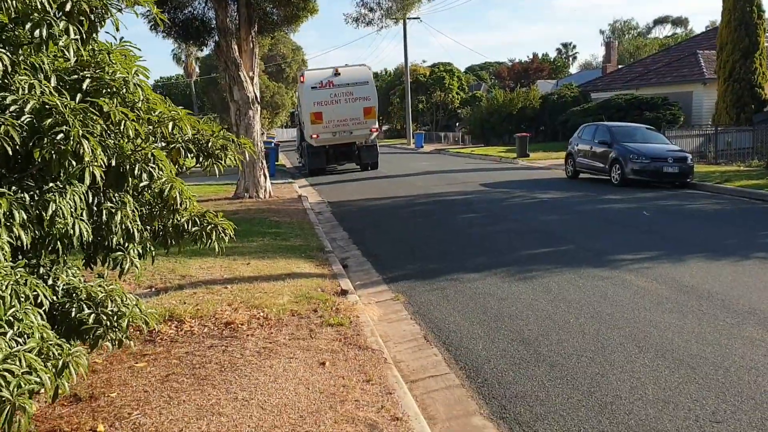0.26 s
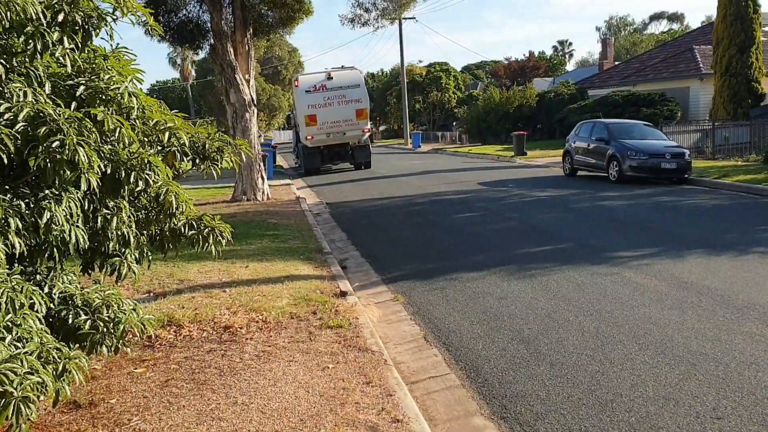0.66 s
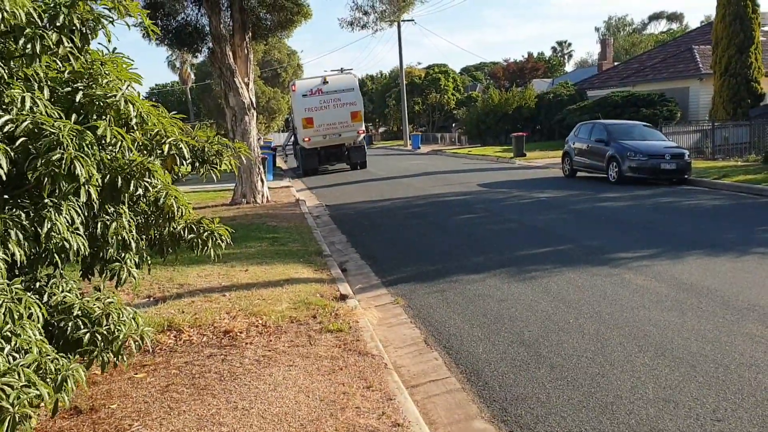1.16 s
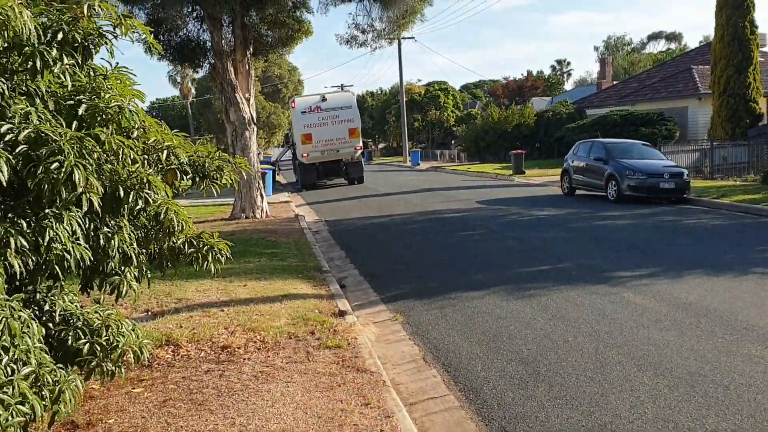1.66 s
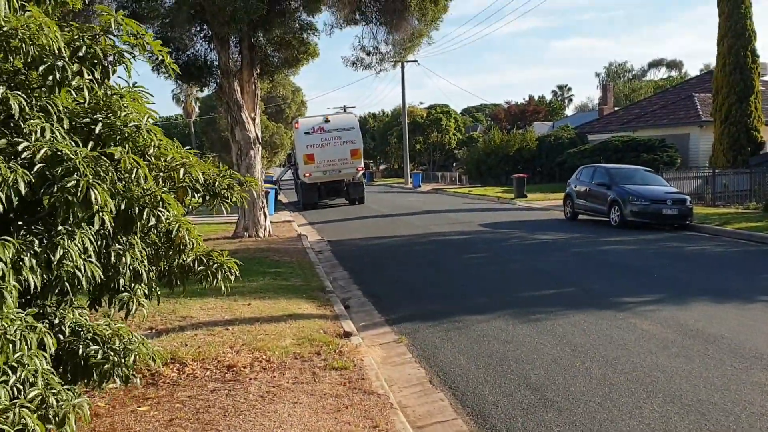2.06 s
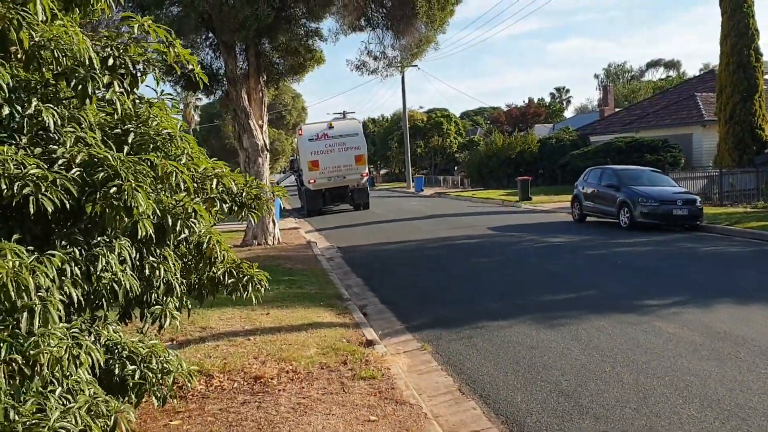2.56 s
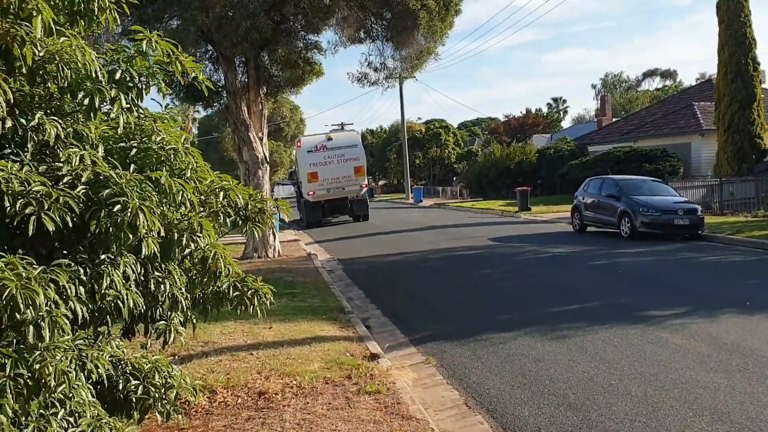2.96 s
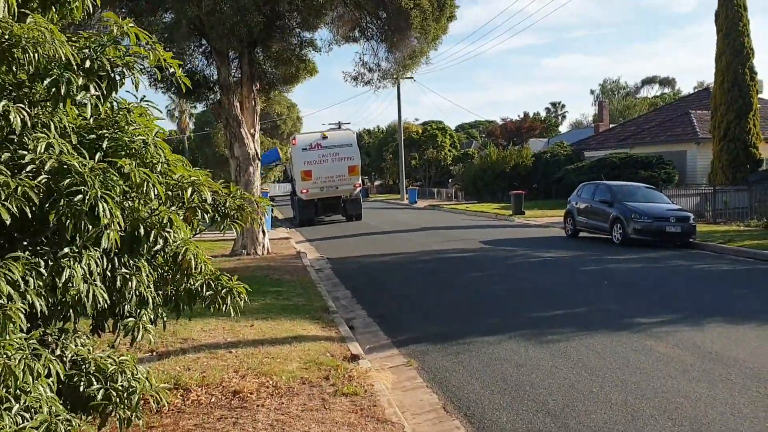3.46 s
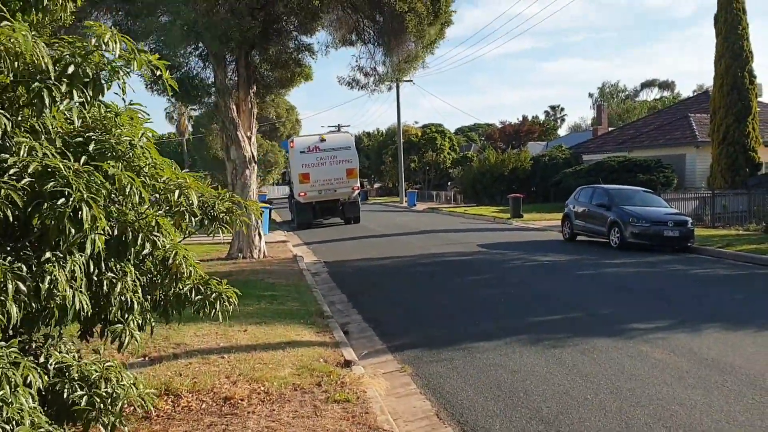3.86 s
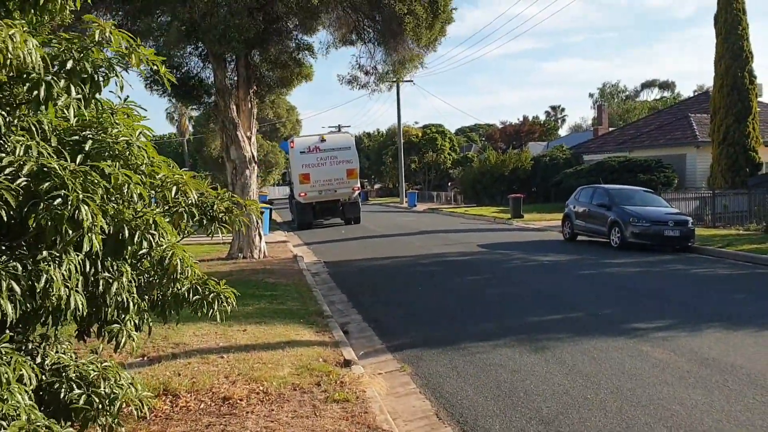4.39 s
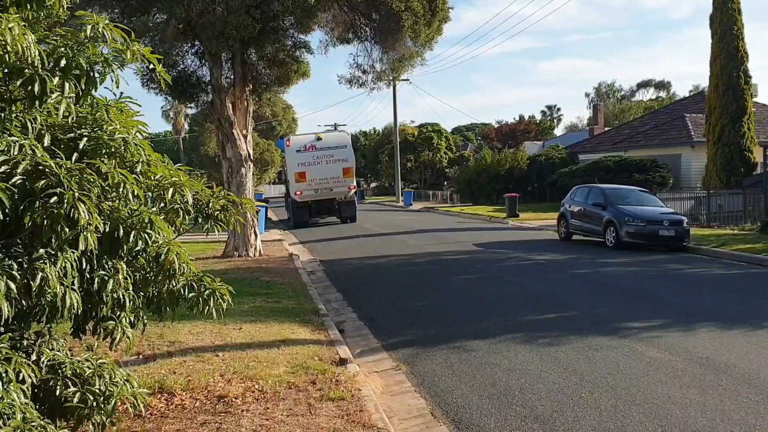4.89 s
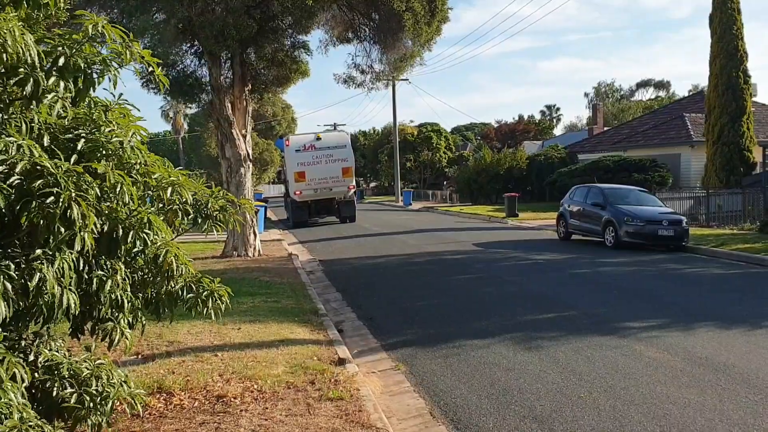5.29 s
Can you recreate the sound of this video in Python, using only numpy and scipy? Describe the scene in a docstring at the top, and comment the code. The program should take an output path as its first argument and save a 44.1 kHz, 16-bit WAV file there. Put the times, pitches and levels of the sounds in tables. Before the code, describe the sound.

A heavy diesel truck some way down an open residential street is heard from the kerb in stereo. At 0 s wind puffs thump the microphone with a tiny tick, and the engine's low drone falls quickly, settling by about 1.5 s into a steady chugging idle with soft clatter. Thin, very high brake squeals flutter from 0.85 s, the last fading around 2.4 s. Short whistling hydraulic rushes come at 1.35 and 2.4 s, with a light knock at 1.7 s. The engine strains slightly near 3 s. A hard, hollow clunk lands at 3.24 s, followed by smaller knocks and a bright hiss that surges until about 3.85 s. A thud at 4.03 s begins the dump: soft bags first, then a dense clatter and hopper boom peaking at 4.4-4.55 s with a clink. The rattle decays under idle, hiss and wind buffets; a faint knock at 5.1 s, hiss easing by 5.5 s.

```python
"""A recycling truck pulls up some way down a street, its diesel sinking to idle amid a few puffs of wind.
The brakes squeal thinly as it settles, and the hydraulic arm reaches out in two short whistling rushes.
The arm grips a wheelie bin with a clunk and hoists it, hissing; then the load tumbles into the hopper.
Engine and squeals are built from sine tones, the rest mostly from coloured noise with shaped levels.
House fronts answer the blows and squeals, leaves rustle faintly, and late puffs buffet the microphone."""
import sys
import numpy as np
from scipy import signal
from scipy.fft import rfft, irfft, next_fast_len
from scipy.io import wavfile
from scipy.ndimage import map_coordinates

SR = 44100
rng = np.random.default_rng(int(sys.argv[2]) if len(sys.argv) > 2 else 0)


def store_pcm(level_fs):
    """Save levels as 16-bit WAV."""
    pcm = np.round(np.clip(level_fs, -1, 1) * 32767).astype(np.int16)
    wavfile.write(sys.argv[1], SR, np.atleast_2d(pcm).T)


N = 243856
TIME = np.arange(N) / SR  # seconds

# Levels in all tables are relative: the functions below balance the layers.
# How fast the engine fires. Each row: time in seconds, firings per second.
FIRING_RATE = [(0, 58), (.3, 53), (.65, 41.2), (1.3, 37.6), (1.55, 35.8), (3.2, 36.4), (4.2, 38.4)]
# How hard the engine works. Each row: time in seconds, load as a clatter level in dB.
ENGINE_LOAD = [(0, -40), (.25, -44), (1.25, -46), (2.2, -44), (2.7, -40.5), (3.7, -40.5), (5.53, -44)]
# Overtones of the firing note. Each row: multiple of the firing rate, level in dB.
OVERTONES = [(3, -10), (4, -11.5), (5, -16.5), (6, -17), (7, -20)]
# Colour of the exhaust puffs. Each row: frequency in Hz, level in dB.
PIPE_COLOUR = [(30, -18), (50, 9), (100, 6), (170, 2.5), (230, -2.5), (330, -20), (600, -31), (1200, -83)]
# Colour of the engine block's clatter. Each row: frequency in Hz, level in dB.
BLOCK_COLOUR = [(200, -36), (300, 1), (430, -2.5), (680, 0.5), (950, -5), (1400, -3), (2100, -3),
                (2400, -9), (3100, -17.5), (3900, -16.5), (5000, -24.5), (7000, -31.5), (10000, -50)]
# Ringing of the engine casing. Each row: frequency in Hz, width in Hz, level in dB.
CASING_MODES = [(596, 37, 1.5), (734, 79, -2), (1102, 46, -0.5), (1460, 140, -16), (2006, 30, 3),
                (2162, 42, -1)]
# The low notes dip or swell as the engine settles to idle.
# Each row: time in seconds, length in seconds, change of firing note in dB, change of boom in dB.
SETTLING = [(.33, .08, 0, 5), (0.826, 0.059, -24, -10), (1.26, 0.056, -1, -16), (1.616, 0.14, -3, 4)]
# Brake squeals. Each row: start in seconds, length in seconds, pitch in Hz, glide in Hz per second,
# starting level in dB, fade in dB per second.
SQUEALS = [(.85, 0.037, 8170, 1000, -49, 30), (0.878, 0.094, 7996, 110, -34.5, 92),
           (0.977, 0.46, 8880, -380, -49, 14), (1.151, 0.114, 13400, -500, -57, 14),
           (1.283, 0.08, 8550, -700, -48, 80), (1.407, 1.05, 8706, 408.5, -47, 17.5)]
# Oil forced through the valve as the arm reaches out.
# Each row: start in seconds, end in seconds, whistle in Hz, whistle level in dB, rush level in dB.
REACHES = [(1.333, 1.493, 3290, -57, -50), (2.367, 2.646, 3390, -55.5, -49.5)]
# Colour of the rush through the valve. Each row: frequency in Hz, level in dB.
VALVE_COLOUR = [(1500, -44), (2200, 7.5), (2500, -7.5), (3400, -9), (4600, -20), (5400, -18), (5700, -6.5),
                (6000, -22), (6500, -20), (7050, -9), (8500, -25), (9700, -17), (10500, -14.5),
                (14000, -22)]
# Colour of the lifting hiss. Each row: frequency in Hz, level in dB.
HISS_COLOUR = [(1200, -37), (1800, -23), (2120, 1), (2400, -9.5), (2780, 1), (3000, -4), (3500, -2.5),
               (3880, 3), (4800, -5), (5500, -1.5), (6100, -6.5), (6800, -19), (7600, -12), (10000, -41)]
# Colour of the higher spray in that hiss. Each row: frequency in Hz, level in dB.
SPRAY_COLOUR = [(5000, -21), (8400, -16), (10000, -5.5), (12100, 0), (12700, -3.5), (13350, 5.5),
                (14000, -8.5), (14600, -9.5)]
# Blows of arm and bin. Each row: time in seconds, clack level in dB, hollow thud level in dB,
# time for the clack to die by 60 dB in seconds.
KNOCKS = [(1.703, -47, -36, 0.22), (2.904, -39.5, -33, 0.08), (3.233, -29, -47, 0.05),
          (3.241, -17.5, -15, 0.038), (3.27, -32.5, -29, 0.061), (3.313, -39, -40, 0.15),
          (3.488, -38, -34, 0.32), (3.564, -44.5, -36.5, 0.27), (4.026, -40, -27, 0.3),
          (5.114, -42.5, -39, .1)]
# Colour of the clacks. Each row: frequency in Hz, level in dB.
CLACK_COLOUR = [(200, -27), (340, -19), (500, -10.5), (750, -2), (1050, -5), (1350, 1.5), (1900, -10.5),
                (2300, -12.5), (2650, -9.5), (3100, -16), (4200, -16.5), (6000, -23), (7000, -34),
                (12000, -30)]
# Ringing steel of the arm. Each row: frequency in Hz, width in Hz, level in dB.
ARM_MODES = [(760, 80, -0.5), (950, 67, -4.5), (1380, 97, -11), (1620, 83, -5), (1943, 37, -0.5),
             (2730, 61, -7)]
# Hollow body of the bin. Each row: frequency in Hz, width in Hz, level in dB.
BIN_MODES = [(82, 32, -1), (145, 37, -1.5), (197, 29, -0.5), (240, 37, -6), (282, 44, -6.5)]
# Bags, cans and bottles landing. Each row: time in seconds, rattle level in dB, rumble level in dB.
DROPS = [(4.03, -37, -35.5), (4.1, -44.5, -28.5), (4.3, -35, -43), (4.359, -33.5, -38), (4.424, -26, -27),
         (4.486, -29, -19.5), (4.534, -27, -30), (4.69, -38.5, -37)]
# Colour of the rubbish. Each row: frequency in Hz, level in dB.
RUBBISH_COLOUR = [(200, -7), (320, -1), (440, -2.5), (660, 1), (830, 1.5), (1020, -6.5), (1350, 4.5),
                  (1530, 0.5), (2100, 1), (3200, -10), (4000, -10.5), (6000, -30.5), (12000, -73)]
# Rumble of the hopper. Each row: frequency in Hz, width in Hz, level in dB.
HOPPER_MODES = [(81.46, 27, -0.5), (125, 29, 0), (160, 27, 4.5), (276, 26, -9)]
# Small bright ticks and clinks. Each row: time in seconds, frequency in Hz, width in Hz, level in dB,
# time to die by 60 dB in seconds.
CLINKS = [(0.024, 2980, 4500, -21, 0.0018), (0.563, 4800, 4960, -32, 0.0051), (1.693, 1916, 790, -34, 0.17),
          (1.79, 11700, 2501, -52, .08), (3.143, 2500, 1000, -38, 0.06), (4.445, 4204, 2500, -34, 0.11),
          (4.541, 3950, 600, -25.5, 0.085)]
# Wind on the microphone ports. Each row: time in seconds, left level in dB, right level in dB.
PUFFS = [(.006, -22, -17.5), (.095, -26.5, -27.5), (.22, -31, -28), (0.423, -52, -25), (3.576, -30, -23),
         (3.847, -25.5, -31), (4.675, -19.5, -28), (4.752, -28, -21), (5.298, -31, -21.5),
         (5.429, -39, -28.5)]
# Gusts in the leaves. Each row: time in seconds, length in seconds, rise over the calm in dB.
GUSTS = [(0, 0.24, 9.5), (0.383, .045, 10.5), (1.7, 0.12, 5.5), (2.846, 0.48, 5)]
# Colour of the leaves. Each row: frequency in Hz, level in dB.
LEAF_COLOUR = [(1500, 4), (3500, 1.5), (5500, 2), (8000, -5), (10500, -2.5), (12000, 2.5), (15000, -3)]
# How alike the noise is at both ears. Each row: frequency in Hz, likeness from 0 to 1.
EAR_LIKENESS = [(50, 0.85), (250, 0.97), (600, 0.85), (1200, 0.48), (2200, 0.67), (4000, 0.12), (7000, 0),
                (12000, 0.037)]
# How long the street echoes. Each row: frequency in Hz, time to die by 60 dB in seconds.
STREET_DECAY = [(100, 0.5), (1500, 0.52), (5000, 0.12), (12000, 0.76)]
# Balance of the two ports. Each row: frequency in Hz, left minus right in dB.
EAR_BALANCE = [(40, -1), (200, -0.5), (1200, 0.5), (2300, 0), (4200, -2.1), (14000, -4)]

NOTE_DB, BOOM_DB = 2.5, 2  # firing note, and boom at twice its rate, over the load
BOOM_HZ, BOOM_WIDTH_HZ = 70.7, 12.5  # the exhaust resonance that carries the boom
STRAINS, STRAIN_S, STRAIN_DB = [1.85, 3.03], 0.063, 6.5  # the boom swells just after the arm meets a load
SQUEAL_RISE_S, SQUEAL_RELEASE_S = 0.011, 0.019
SCOOP_HZ, SCOOP_S = 108, 0.0308  # each squeal slides up into its pitch
VALVE_OPEN_S, VALVE_SHUT_S = 3.146, 5.347  # the valve stays open through the lift
OPEN_S, SHUT_S = 0.038, 0.33  # how gradually it opens and shuts
HOIST_START_S, HOIST_END_S = 3.33, 3.847  # the flow surges while the bin goes up
# Each flow: steady level in dB, surge level in dB, surge rise in seconds, surge release in seconds.
HISS_FLOW, SPRAY_FLOW = (-47.5, -41.5, 0.1, 0.26), (-47.5, -39, 0.17, 0.16)
DROP_RISE_S, RATTLE_T60_S, RUMBLE_T60_S = 0.014, 0.56, 0.6  # T60: time to die by 60 dB
CANS_FROM_S, CANS_BLEND_S = 4.2, 0.3  # soft bags give way to hard things
PUFF_S, CALM_DB = 0.023, -63  # length of a wind puff, level of the leaves between gusts
TOP_HZ = 14600  # nothing above this is kept


def engine():
    """Six cylinders fire in turn: low exhaust notes, puffs through the pipe and clatter from the block."""
    (rate,), (load_db,) = curves(FIRING_RATE), curves(ENGINE_LOAD)
    note_db, boom_db = exhaust_levels(rate, load_db)
    firing = np.cumsum(rate * (1 + 0.00782 * wobble(12))) / SR  # running count of firings

    def order(multiple, waver_db):
        phase = 2 * np.pi * (multiple * firing + rng.random())
        return np.sqrt(2) * np.sin(phase) * amp(waver_db * wobble(11))

    notes = amp(note_db) * order(1, waver_db=2.0) + amp(boom_db) * order(2, waver_db=1.5)
    # the low notes drift from ear to ear
    notes = notes * amp(3.0 * wobble(4.02) * np.array([[1], [-1]]) - 1.5)
    overtones = sum(amp(db) * order(multiple, waver_db=3.5) for multiple, db in OVERTONES)

    # each cylinder has its own strength, and no two firings are quite alike
    stroke = firing.astype(int)
    cylinders = rng.standard_normal(size=6)
    each_firing = rng.standard_normal(N)[stroke]
    strength = amp(1.9 * cylinders[stroke % len(cylinders)] + 2.86 * each_firing)
    beat = strength * np.sin(np.pi * np.sqrt(firing % 1)) ** 2  # quick rise, slower fall

    puffs = amp(3.0) * unit(0.91 + beat) * noise(shape(PIPE_COLOUR))
    block = amp(-3.5) * noise(lambda hz: shape(BLOCK_COLOUR)(hz) * ripple(hz, depth_db=2.5))
    casing_noise = noise(lambda hz: body(CASING_MODES)(hz) * band(1300, 2300)(hz))
    casing = amp(-10.5 + 1.7 * wobble(8.2)) * casing_noise
    clatter = unit(1 + 0.24 * beat) * (block + casing)

    # a gear whine wanders
    whine_hz = 2110 + 50 * wobble(6) + 70 * wobble(300)
    whine = amp(-16.5 + 3.9 * wobble(8.8)) * sweep(whine_hz)
    return notes + amp(load_db) * (overtones + whine + puffs + clatter)


def exhaust_levels(rate, load_db):
    """Both low notes follow the load; the boom is strongest on the exhaust resonance and under strain."""
    note_change_db = sum(db * swell(s, length) for s, length, db, _ in SETTLING)
    boom_change_db = sum(db * swell(s, length) for s, length, _, db in SETTLING)
    resonance_db = -10 * np.log10(1 + ((2 * rate - BOOM_HZ) / BOOM_WIDTH_HZ) ** 2)
    strain_db = STRAIN_DB * sum(swell(s, STRAIN_S) for s in STRAINS)
    note_db = load_db + NOTE_DB + note_change_db
    return note_db, load_db + BOOM_DB + resonance_db + strain_db + boom_change_db


def hydraulics():
    """Oil whistles through the valve in two short reaches, then hisses through the whole lift."""
    out = np.zeros((2, N))
    for start, end, hz, whistle_db, rush_db in REACHES:
        whistle = amp(whistle_db) * sweep(hz + 60 * wobble(400))
        rush = amp(rush_db) * noise(shape(VALVE_COLOUR))
        out += gate(start, end, fade=0.071) * amp(3.3 * wobble(30.05)) * (whistle + rush)
    hiss_level, spray_level = flow(*HISS_FLOW), flow(*SPRAY_FLOW)

    def jet():
        hiss = noise(lambda hz: shape(HISS_COLOUR)(hz) * ripple(hz, depth_db=3.0))
        spray = noise(lambda hz: shape(SPRAY_COLOUR)(hz) * ripple(hz, depth_db=4.0))
        return hiss_level * hiss + spray_level * spray

    # the echo paths shift as the arm swings: blend two jets with different echoes
    swing = np.pi * TIME * 1.1
    lift = np.cos(swing) * jet() + np.sin(swing) * jet()
    return out + amp(0.58 * wobble(18)) * lift


def flow(steady_db, surge_db, rise, release):
    """A steady flow through the open valve, and a surge on top during the hoist."""
    steady = amp(steady_db) * held(VALVE_OPEN_S, VALVE_SHUT_S, OPEN_S, SHUT_S)
    return steady + amp(surge_db) * held(HOIST_START_S, HOIST_END_S, rise, release)


def knocks():
    """Each blow is a noisy clack of contacts, a short ring of the steel arm and a thud of the hollow bin."""
    clack_level = sum(amp(db) * strike(s, length, rise=0.0012) for s, db, _, length in KNOCKS)
    ring_level = sum(amp(db) * strike(s, length + 0.03, rise=0.0018) for s, db, _, length in KNOCKS)
    thud_level = sum(amp(db) * strike(s, length + 0.08, rise=0.0046) for s, _, db, length in KNOCKS)
    clack = amp(2.5) * clack_level * noise(shape(CLACK_COLOUR))
    steel = amp(-5.0) * ring_level * noise(lambda hz: body(ARM_MODES)(hz) * band(1600, 2800)(hz))
    thud = amp(2.0) * thud_level * noise(lambda hz: body(BIN_MODES)(hz) * band(200, 440)(hz))
    return clack + steel + thud


def tumble():
    """Soft bags drop first, then cans and bottles land in a dense shower; the hopper rumbles."""
    rattle_power = sum((amp(db) * strike(s, RATTLE_T60_S, DROP_RISE_S)) ** 2 for s, db, _ in DROPS)
    rumble_power = sum((amp(db) * strike(s, RUMBLE_T60_S, DROP_RISE_S)) ** 2 for s, _, db in DROPS)

    # about 300 random landings a second, each dying away over 4 ms
    landings = (rng.random(N) < 300 / SR) * amp(6.9 * rng.uniform(-1.5, 1, size=N))
    contacts = unit(signal.lfilter([1], [1, -np.exp(-1 / (0.004 * SR))], landings) + 2.3)
    hard = contacts * noise(lambda hz: shape(RUBBISH_COLOUR)(hz) * ripple(hz, depth_db=2.0))
    soft = amp(10.5) * filtered(hard, lambda hz: 1 / (1 + (hz / 1000) ** 2))  # muffled treble

    hardness = np.clip((TIME - CANS_FROM_S) / CANS_BLEND_S, 0, 1)
    rattle = np.sqrt(rattle_power) * (hardness * hard + (1 - hardness) * soft)
    hopper = noise(lambda hz: body(HOPPER_MODES)(hz) * band(180, 600)(hz))
    return rattle + amp(4.0) * np.sqrt(rumble_power) * hopper


def brakes():
    """The drums sing in gliding, fading squeals; scattered echoes make each flutter differently at each ear."""
    out = np.zeros((2, N))
    for start, length, hz, glide, db, fade in SQUEALS:
        age = np.maximum(TIME - start, 0)
        pitch = hz + glide * np.minimum(age, length) - SCOOP_HZ * np.exp(-age / SCOOP_S)
        tone = np.exp(2j * np.pi * np.cumsum(pitch + 16 * wobble(120)) / SR)
        level = amp(db - fade * age) * held(start, start + length, SQUEAL_RISE_S, SQUEAL_RELEASE_S)
        for ear in out:
            echoes = 0.58 * (wobble(49.96) + 1j * wobble(49.74))
            ear += level * np.real(tone * (1 + echoes))
    return out


def clinks():
    """Short bright ticks: bands of noise that start at once and die away."""
    out = np.zeros((2, N))
    for s, hz, width, db, length in CLINKS:
        out += amp(db) * strike(s, length, rise=length / 25) * noise(band(hz, width))
    return out


def street(x):
    """The diffuse answer of house fronts and trees: noise whose every pitch dies at its own pace."""
    hz, t, grains = signal.stft(rng.standard_normal((2, SR)), SR, nperseg=256)
    decay = amp(-60 * t / along(STREET_DECAY, hz)[:, None])
    tail = signal.istft(grains * decay, SR, nperseg=256)[1]
    delayed = np.pad(x, ((0, 0), (600, 0)))  # 600 samples
    return signal.fftconvolve(delayed, tail / np.linalg.norm(tail[0]), axes=1)[:, :N]


def wind():
    """Leaves rustle faintly in the gusts, and puffs hit each microphone port on their own."""
    gust_db = sum(db * swell(s, length) for s, length, db in GUSTS)
    rustle = amp(CALM_DB + gust_db) * noise(shape(LEAF_COLOUR))
    push = sum(amp([[left], [right]]) * swell(s, PUFF_S) for s, left, right in PUFFS)
    rumble = [(25, -5), (45, -4), (75, 3), (140, -4.0), (250, -19.0), (600, -43), (2000, -78)]  # Hz, dB
    eddies = filtered(rng.standard_normal((2, N)), shape(rumble))
    return rustle + push * unit(eddies)


def amp(db):
    """Turn decibels into a gain."""
    return 10 ** (np.asarray(db) / 20)


def unit(x):
    """Scale to an average strength (rms) of 1."""
    return x / np.sqrt(np.mean(x ** 2) + 1e-20)


def along(points, hz):
    """Read a curve of (Hz, value) points, joined on a log frequency axis."""
    f, v = np.transpose(points)
    return np.interp(np.log(hz + 1), np.log(f + 1), v)


def curves(rows):
    """One value per sample for each column after the time."""
    s, *columns = np.transpose(rows)
    return [np.interp(TIME, s, column) for column in columns]


def sweep(hz):
    """A sine tone whose pitch follows a curve."""
    return np.sin(2 * np.pi * np.cumsum(hz) / SR)


def gate(start, end, fade):
    """1 between two times, with soft edges."""
    return np.clip(np.minimum(TIME - start, end - TIME) / fade + .5, 0, 1)


def held(start, end, rise, release):
    """Attack, hold and release."""
    attack = 1 - np.exp(-np.maximum(TIME - start, 0) / rise)
    return attack * np.exp(-np.maximum(TIME - end, 0) / release)


def swell(s, length):
    """A smooth hump around one moment."""
    return np.exp(-.5 * ((TIME - s) / length) ** 2)


def strike(s, t60, rise):
    """The level of a blow: a quick rise, then a fall of 60 dB in t60 seconds."""
    age = np.maximum(TIME - s, 0)
    return (1 - np.exp(-age / rise)) * 1000. ** (-age / t60)


def wobble(rate):
    """A smooth random curve through `rate` random points a second."""
    return map_coordinates(rng.standard_normal(int(N * rate / SR) + 4), [TIME * rate])


def filtered(x, response):
    """Multiply the spectrum of x by a response to frequency."""
    m = next_fast_len(N + SR // 2)
    return irfft(rfft(x, m) * response(np.fft.rfftfreq(m, 1 / SR)), m)[..., :N]


def shape(points):
    """The response that follows (Hz, dB) points."""
    return lambda hz: amp(along(points, hz))


def body(modes):
    """The response of a struck object: resonances with alternating signs."""
    def response(hz):
        total = 0
        for k, (centre, width, db) in enumerate(modes):
            damping = 1j * hz * width
            total = total + (-1) ** k * amp(db) * damping / (centre ** 2 - hz ** 2 + damping)
        return total
    return response


def band(centre, width):
    """The response of a steep-sided hump."""
    return lambda hz: 1 / (1 + (2 * (hz - centre) / width) ** 4)


def ripple(hz, depth_db):
    """Echoes from road and walls comb the spectrum above the bass, here with random teeth."""
    teeth = map_coordinates(rng.standard_normal(SR // 40), [hz / 45])
    return amp(depth_db * teeth * np.clip(hz / 700 - .4, 0, 1))


def noise(response):
    """Coloured stereo noise of rms 1, partly alike in both ears."""
    def mid_and_side(hz):
        turn = np.arccos(np.clip(along(EAR_LIKENESS, hz), -1, 1)) / 2
        return response(hz) * np.array([np.cos(turn), np.sin(turn)])

    mid, side = filtered(rng.standard_normal((2, N)), mid_and_side)
    return unit(np.array([mid + side, mid - side]))


def scene():
    """The truck works in the street; the wind is close by."""
    struck_and_rubbed = knocks() + tumble() + clinks() + brakes()
    echoes = amp(-4.5) * street(struck_and_rubbed)
    return engine() + hydraulics() + struck_and_rubbed + echoes + wind()


def record(dry):
    """The two ports differ slightly in tone; the recorder drops the deepest bass and the top treble."""
    def response(hz):
        ports = amp(along(EAR_BALANCE, hz) * np.array([[.5], [-.5]]))
        return ports * (1 - np.exp(-(hz / 30) ** 4)) * (hz < TOP_HZ)

    soft_ends = np.clip(np.minimum(TIME, TIME[::-1]) / .004, 0, 1)  # 4 ms fades
    return filtered(dry * soft_ends, response)


dry = scene()
out = record(dry)
store_pcm(out)
```